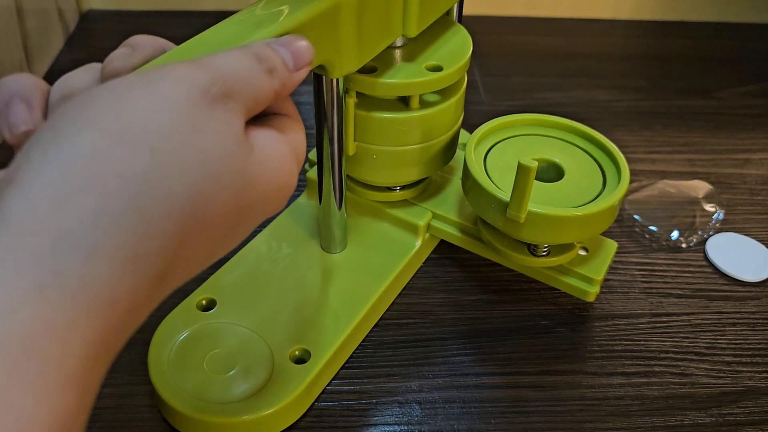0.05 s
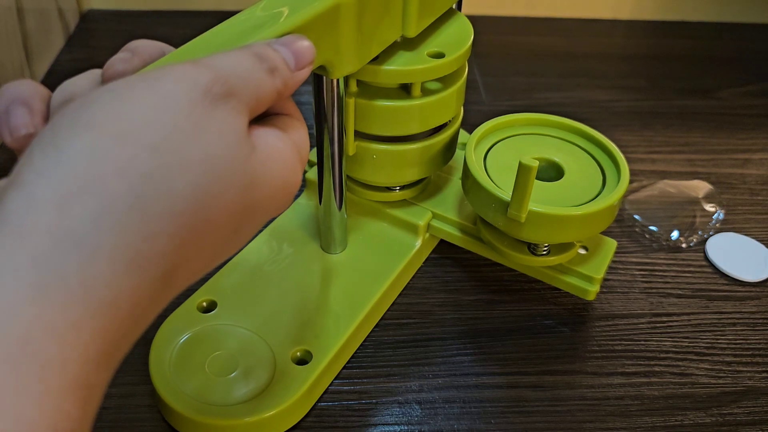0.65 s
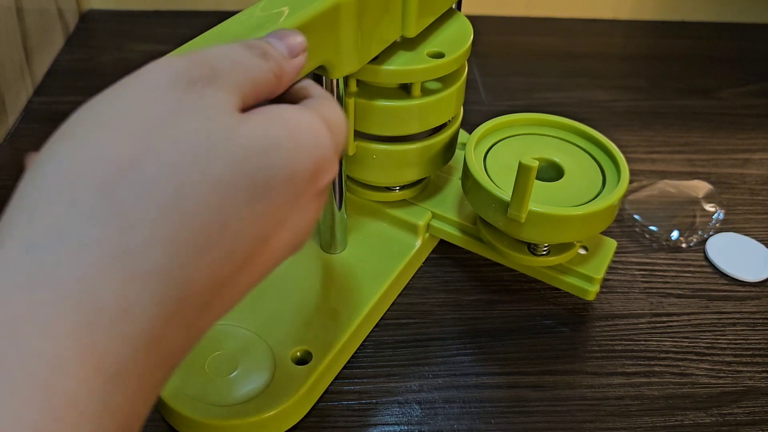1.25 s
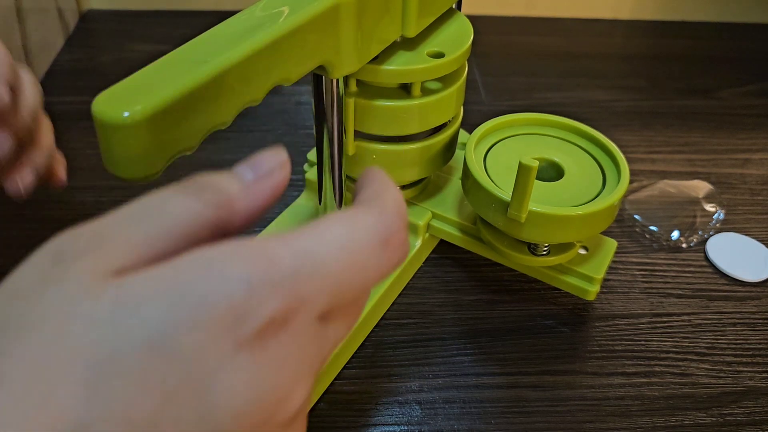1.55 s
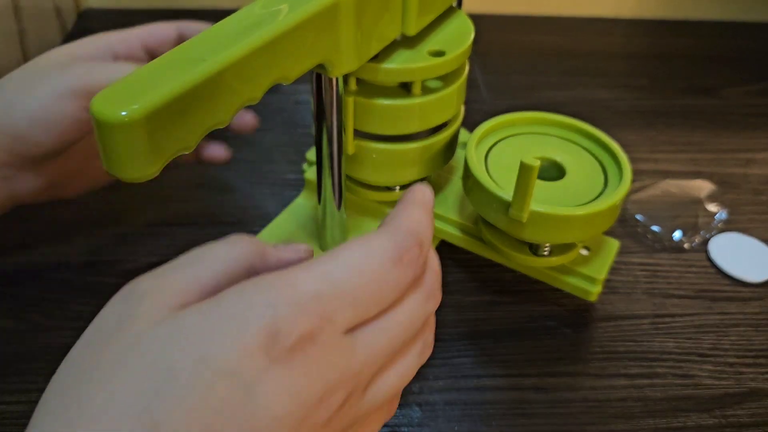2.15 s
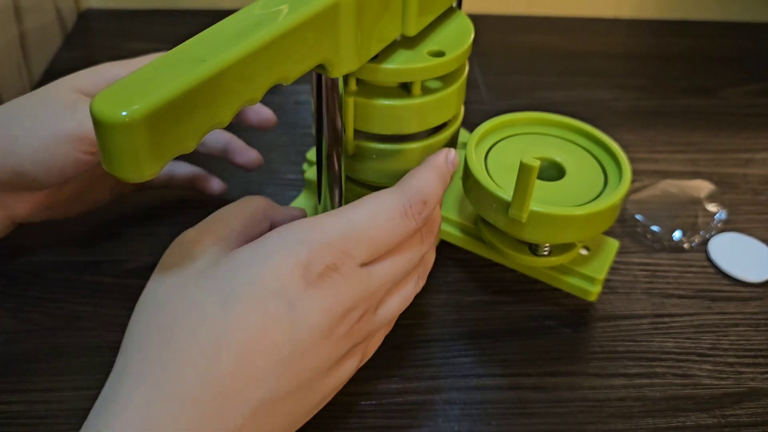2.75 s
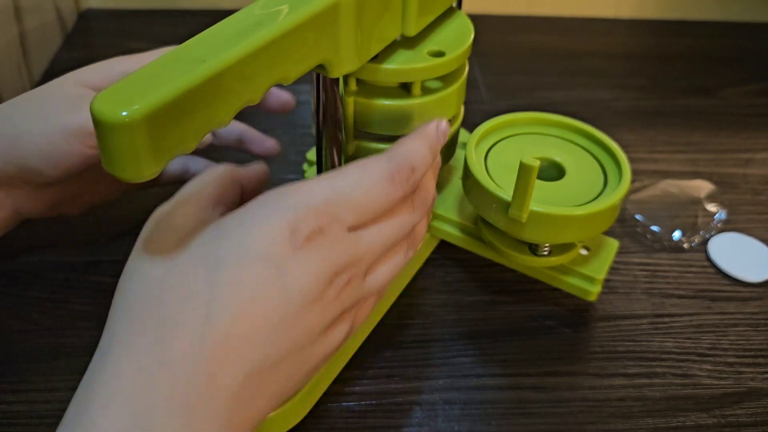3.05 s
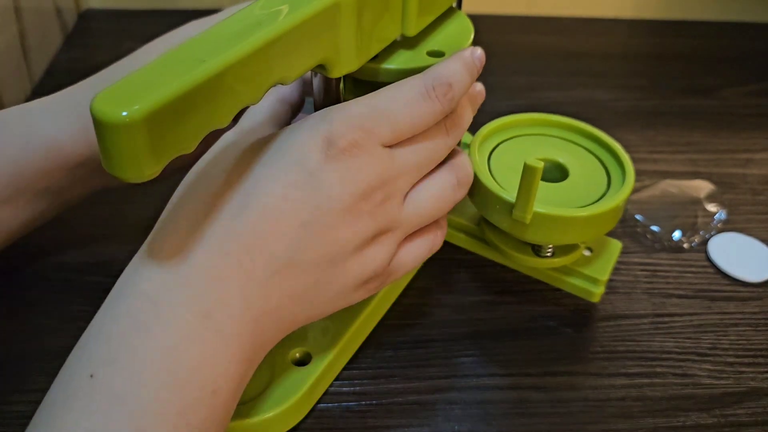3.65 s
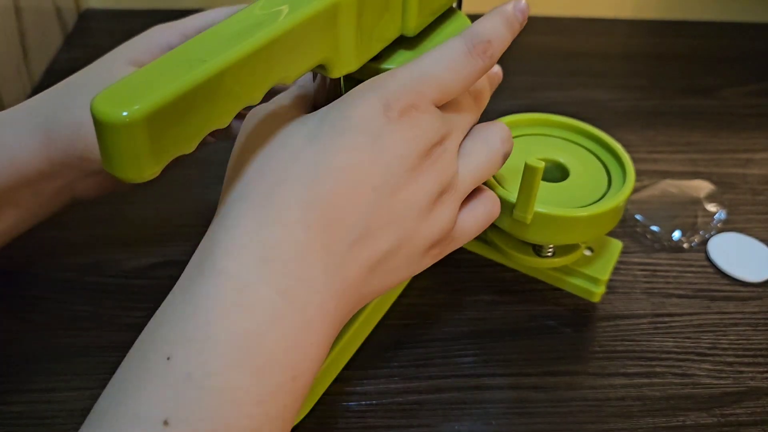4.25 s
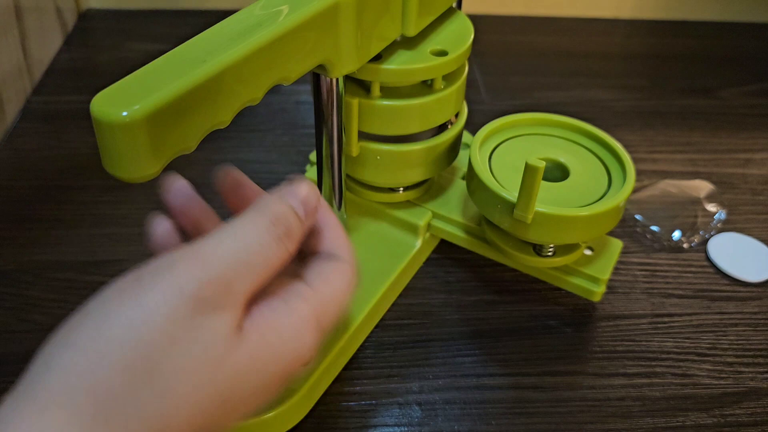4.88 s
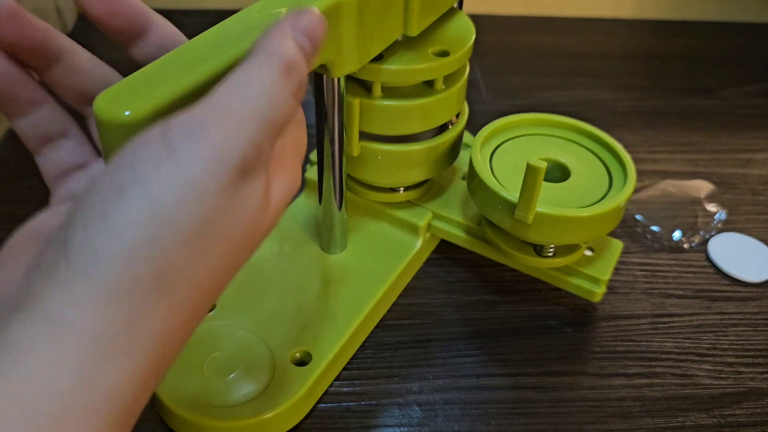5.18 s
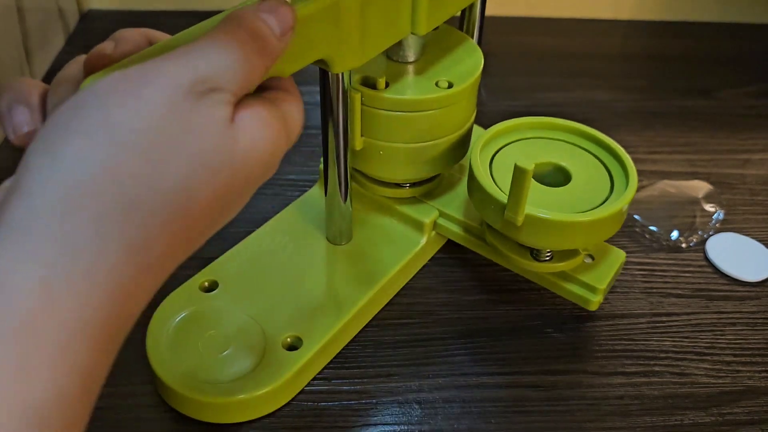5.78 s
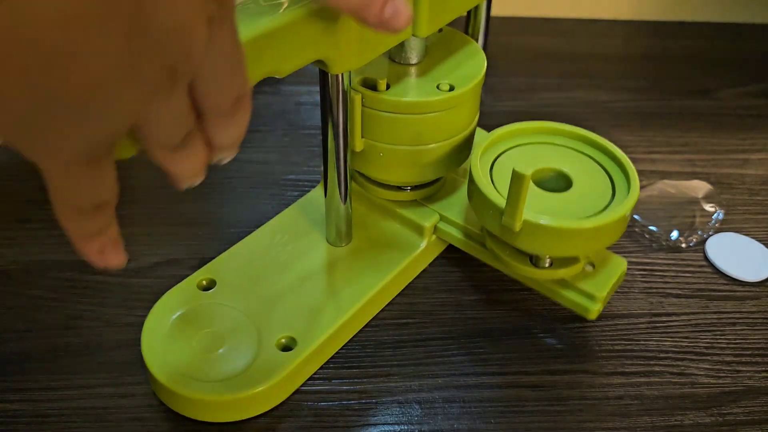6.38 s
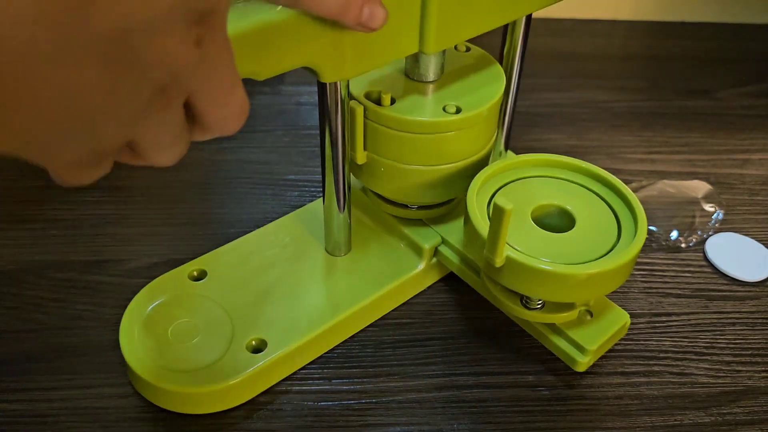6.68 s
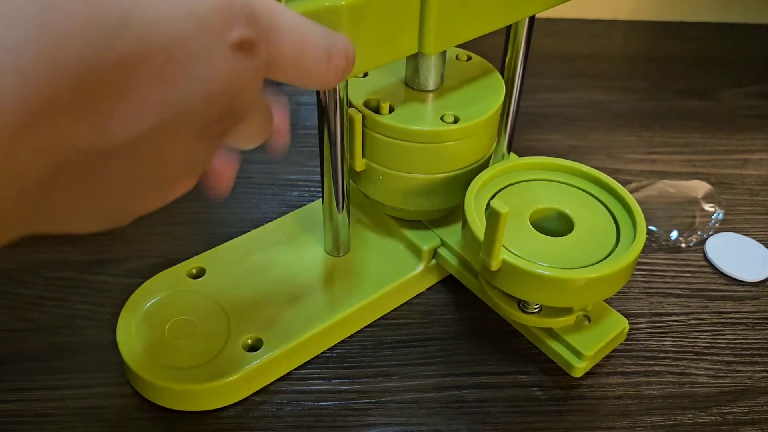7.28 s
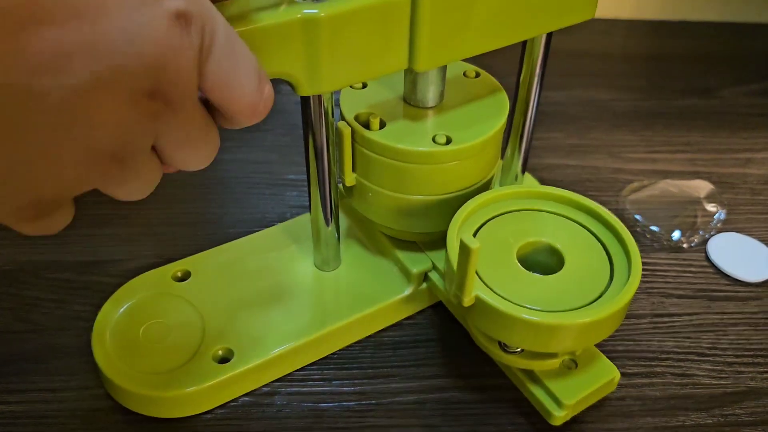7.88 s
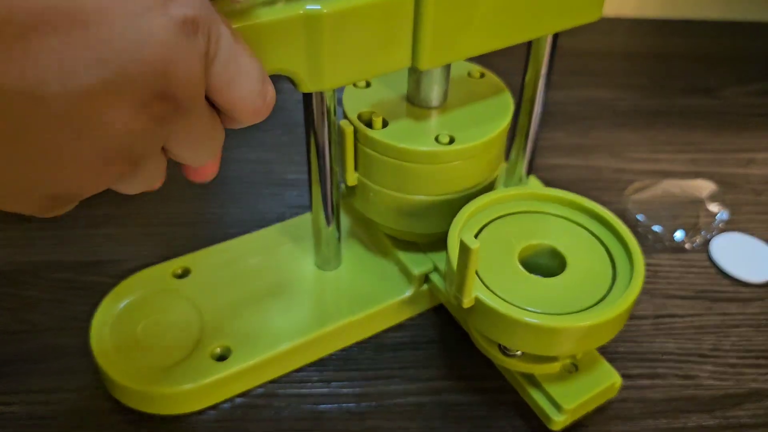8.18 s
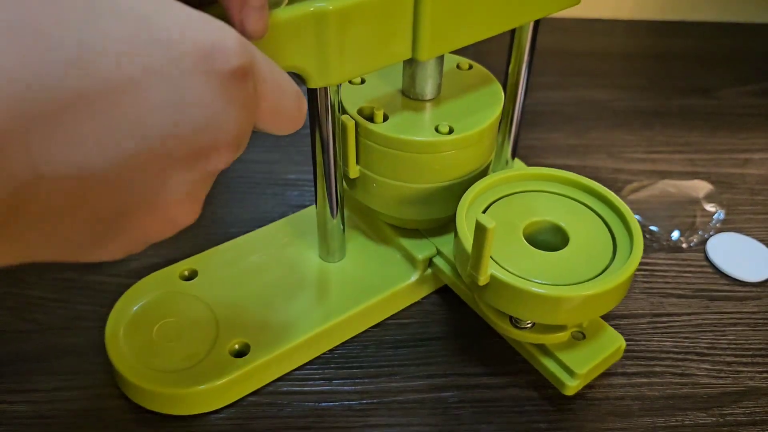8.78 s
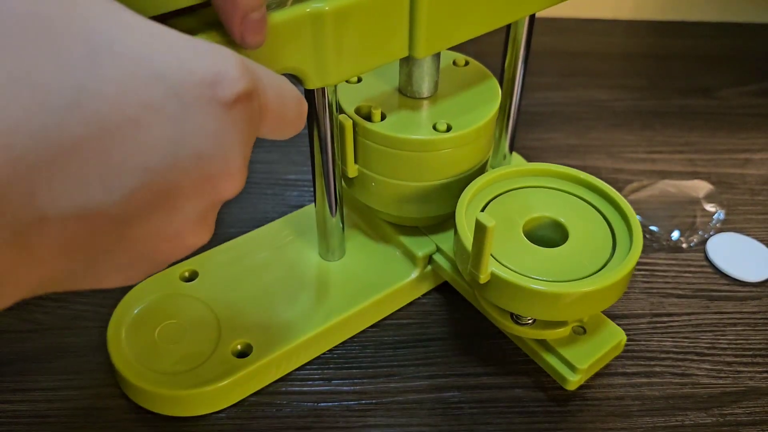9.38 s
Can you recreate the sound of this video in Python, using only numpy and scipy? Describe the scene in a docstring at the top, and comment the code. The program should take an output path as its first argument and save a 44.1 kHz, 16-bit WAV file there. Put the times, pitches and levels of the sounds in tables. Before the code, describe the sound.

Irregular plastic clacks and dull knocks from a lever-operated button maker in a small room, its held handle creaking softly later on.

```python
"""A hand-press button maker

A plastic press is worked on a wooden desk in a small room. The lever is let up, the die tray is
swivelled and the lever is pulled down until the dies clack together. Each contact chatters briefly,
rings the housing and the steel parts and thumps the desk. In between, hands slide and rumble.
Near the end the held lever creaks and squeaks faintly. Distant traffic swells and fades outside."""
import sys
import numpy as np
from scipy import signal
from scipy.io import wavfile

SR = 44100
rng = np.random.default_rng(int(sys.argv[2]) if len(sys.argv) > 2 else 0)


def int16_out(signal):
    """Quantize to a 16-bit WAV file."""
    q = np.round(np.clip(np.atleast_2d(signal).T, -1, 1) * 32767)
    wavfile.write(sys.argv[1], SR, q.astype(np.int16))


N = 420273
TIME = np.arange(N) / SR

# The tone of three noises: the quiet room, distant traffic and gripping hands.
# Each row: frequency in Hz, relative level in dB.
ROOM_TONE = [(25, -2.5), (55, 6), (85, -19), (135, -9), (250, -5.5), (400, -26.5), (1200, -28.5),
             (4000, -42), (9000, -76), (16000, -56.5)]
TRAFFIC_TONE = [(150, -17), (350, 6), (600, 4.5), (900, -9), (1500, -17.5), (3000, -25), (6000, -47.5)]
GRIP_TONE = [(60, -9), (95, 0.5), (120, 4.5), (170, 1), (260, -3), (400, -15), (800, -26.5), (2000, -43.5),
             (5000, -53.5)]
# Hiss of sliding skin. # Each row: frequency in Hz, relative level in dB.
SLIDE_HISS = [(300, -21.5), (1500, 4), (4000, 0), (7000, -6), (10000, -12.5), (12000, 7), (16000, -7)]
# The room's echo. Each row: frequency in Hz, seconds to fade by 60 dB.
ECHO_FADE = [(120, 0.45), (500, 0.36), (2000, 0.47), (7000, 0.35), (14000, 0.38)]
# How alike left and right are. Each row: frequency in Hz, likeness (1 means the same).
STEREO_LIKENESS = [(100, 0.98), (250, 0.88), (600, 0.77), (1200, 0.16), (2500, 0.11), (12000, 0.072)]
# Distant traffic outside swells and fades. Each row: loudest moment in seconds, level in dB.
TRAFFIC_SWELLS = [(2.0, -57.5), (9.1, -54)]
# Hands bear on the press. Each row: start and end in seconds, rumble in dB, desk ring in dB.
HAND_GRIPS = [(0, 2.4, -63, -88.5), (3.6, 3.64, -51, -68), (5.3, 5.696, -38.5, -68), (6.1, 6.235, -58, -72),
              (6.75, 8.7, -55.5, -72.5), (8.8, 9.9, -52.5, -74)]
# Skin slides over plastic. Each row: start and end in seconds, hiss in dB.
SKIN_SLIDES = [(1.1, 1.6, -76.5), (1.95, 2.03, -74.5), (2.24, 2.29, -71), (4.84, 5.06, -67.5),
               (5.95, 6.58, -72), (7.5, 7.58, -71), (7.7, 9.3, -79), (8.035, 8.04, -81)]
# The held lever's squeak. Each row: time in seconds, pitch in Hz, level in dB.
SQUEAK_PATH = [(8.82, 10300, -100), (8.881, 11950, -67.5), (8.941, 12860, -82), (9.0, 11900, -75),
               (9.059, 11400, -84), (9.12, 10830, -99)]

# The notes that ring in the desk, the base plate and the press (frame and housing, then steel).
# Each row: pitch in Hz, relative level in dB, seconds to fade by 60 dB.
DESK_NOTES = [(72, -10, .3), (99, -12, .15), (119, 0, .46), (184, -6, .25)]
BASE_NOTES = [(149.6, -1, .12), (181, -1, .15), (237.2, 6, 0.11), (301, -5, 0.52), (342.5, 1, 0.14)]
PRESS_NOTES = [(341.2, -4.5, 0.067), (593, -2, 0.06), (794, -8, 0.15), (916, -12, 0.045),
               (1256, -9.5, 0.096), (1410, -0.5, 0.03), (1671, -9.5, 0.043), (1825, -7, 0.17),
               (2023, -3, 0.07), (4620, -11, 0.24), (7250, -2.5, 0.12), (11880, -13.5, 0.13)]
# The tone given to the struck plastic. Each row: frequency in Hz, relative level in dB.
PLASTIC_TONE = [(150, -6), (450, 2), (750, 1), (1100, -1), (1700, 6), (2800, 5), (4500, -1), (7300, -3.5),
                (9800, -13.5), (12000, 0.5), (16000, -15)]
# The borders in Hz of four ranges, from low to high: desk, frame, housing, steel.
PART_BORDERS = [70, 320, 1200, 5000, 16500]
# Heavy blows lose their top treble. Each row: housing level in dB, treble limit in Hz.
TREBLE_LIMITS = [(-32.5, 22000), (-26, 10500), (-15, 11500)]

# Light ticks of the steel rods and spring. Each row: start in seconds, strength in dB, pitch in Hz.
STEEL_TICKS = [(0.3141, -50, 3900), (0.486, -60.5, 7300), (0.6679, -39, 4250), (1.76, -57.5, 11300),
               (2.2737, -54.5, 12100), (3.2185, -51, 4540), (4.0278, -52.5, 4440), (6.325, -50, 4240),
               (7.0998, -55, 5340), (7.1477, -54.5, 4450), (8.0334, -53.5, 11560), (8.2783, -57.5, 11200),
               (8.311, -56, 3750), (9.1336, -40, 3400)]
# Dull knocks of hand and lever on the frame.
# Each row: start in seconds, strength in dB, desk thump in dB, pitch in Hz.
FRAME_KNOCKS = [(0.076, -45.5, -34, 2070), (0.091, -37.5, -36, 880), (0.372, -47, -55, 980),
                (0.666, -32, -35, 495), (4.03, -39, -41.5, 844), (4.473, -38.5, -52, 560),
                (4.496, -37, -41.5, 1580), (5.181, -41.5, -36.5, 600), (5.277, -37.5, -45.5, 527),
                (5.353, -45, -22.5, 1533), (5.678, -29, -22, 687), (6.696, -48.5, -36, 670),
                (6.969, -46.5, -36.5, 570), (7.447, -48.5, -62, 623), (7.852, -38, -33, 634),
                (8.884, -48, -44.5, 696), (8.992, -48.5, -46, 654), (9.178, -45, -40.5, 560),
                (9.462, -48, -63.5, 693)]
# Loose plastic parts rattle. Each row: start in seconds, strength in dB,
# hardness (steel level minus housing level) in dB, chatter time in seconds, pitch in Hz.
LOOSE_RATTLES = [(0.057, -41, -34, 0.0042, 1990), (4.338, -37, -12.5, 0.0073, 2030),
                 (5.189, -46.5, -21.5, .022, 2593), (5.701, -29, -9.5, 0.014, 1564),
                 (6.378, -58.5, -26, 0.00095, 1310), (6.602, -55.5, -32.5, .005, 1440),
                 (6.842, -45, -15, 0.012, 2740), (7.802, -50, -30, 0.0086, 2580),
                 (8.476, -31, -28, 0.013, 2130), (8.509, -39, -18, 0.0072, 1810)]
# Lever, tray and dies hit their stops. Each row: start in seconds, strength in dB,
# desk thump in dB, hardness in dB, chatter time in seconds, pitch of the struck part in Hz.
STOP_CLACKS = [(0.637, -45, -34.5, -23, 0.0066, 1140), (0.654, -35, -22.5, -11.5, 0.0014, 4400),
               (3.334, -36, -30.5, -18, 0.005, 1960), (3.349, -31, -29.5, -11, 0.011, 1990),
               (3.377, -40.5, -37.5, -16, .004, 1960), (3.654, -49.5, -49, -15, 0.0035, 1400),
               (3.705, -48, -41, -15, 0.0064, 1510), (4.319, -43.5, -34, -20.5, 0.01, 518),
               (5.317, -27.5, -46.5, -14.5, .003, 1560), (5.38, -23, -24, -16.5, .007, 1820),
               (5.387, -14.5, -26.5, -3.5, 0.0083, 1800), (5.402, -13.5, -20, -11, .003, 931),
               (5.561, -21.5, -22.5, -5.5, 0.0099, 1040), (7.485, -41.5, -38.5, -20.5, 0.0031, 2050),
               (7.837, -49.5, -54, -18, 0.0024, 2890), (8.421, -30, -35, -3.5, 0.00068, 3140),
               (8.444, -35, -26.5, 3, 0.0016, 3400), (8.454, -42, -36, 9.5, 0.0044, 4500)]


def from_db(db):
    """Turn decibels into a number to multiply by."""
    return 10 ** (np.asarray(db) / 20)


def unit_energy(x):
    """Scale a sound so that its energy, averaged over the channels, is 1."""
    return x / np.sqrt(np.mean(np.sum(x ** 2, axis=-1)) + 1e-20)


def at_hz(table, hz):
    """Read a value between the rows of a frequency table."""
    frequencies, values = np.transpose(table)
    return np.interp(np.log(hz), np.log(frequencies), values)


def band(x, low, high, order=2):
    """Keep the sound between two frequencies in Hz."""
    return signal.sosfilt(signal.butter(order, [low, high], "band", fs=SR, output="sos"), x + 1e-18)


def convolve(x, response):
    """Let every sample of x set off its own copy of the response."""
    return signal.fftconvolve(np.atleast_2d(x), np.atleast_2d(response), axes=-1)[:, :N]


def stereo_bands(size):
    """Give (Hz, noise) for each half octave; left and right are less alike in the treble."""
    edges = 22 * 2 ** np.arange(0, 9.6, .5)
    white = rng.standard_normal((2, 2, size + 4000))
    for k, (low, high) in enumerate(zip(edges, edges[1:])):
        mid, side = band(white[k % 2], low, high)[:, -size:]
        hz = np.sqrt(low * high)
        alike = np.clip(at_hz(STEREO_LIKENESS, hz), -.99, .99)
        yield hz, np.sqrt(1 + alike) * mid + np.sqrt(1 - alike) * side * [[1], [-1]]


def noise(tone):
    """Steady stereo noise with the given tone and an average power of 1."""
    return np.sqrt(N) * unit_energy(sum(from_db(at_hz(tone, hz)) * x for hz, x in stereo_bands(N)))


def ringing(notes, scatter_db=0, blur=0):
    """A struck object rings at its own notes; loose joints can blur their pitch."""
    t, out = TIME[:SR // 2], 0
    for k, (hz, db, fade_s) in enumerate(notes):
        steps = np.arange(0, .5, 4 / hz)
        wander = np.interp(t, steps, np.cumsum(rng.normal(0, blur, len(steps))))
        lag = rng.normal(0, 3e-5, (2, 1))   # high notes reach the two sides out of step
        wave = np.sin(2 * np.pi * hz * (t + lag) + wander - wander[0]) * from_db(-60 * t / fade_s)
        out = out + (-1) ** k * from_db(db + scatter_db * rng.normal()) * unit_energy(wave)
    return out


def rumble_and_traffic(rumble_db=-55, traffic_db=-67.5, swell_s=.12, lag_s=.0004):
    """The room rumbles low; distant traffic swells and fades, reaching the right side first."""
    traffic = noise(TRAFFIC_TONE)
    traffic[0] = np.interp(TIME - lag_s, TIME, traffic[0])
    swells = sum(from_db(db) / (1 + ((TIME - s) / swell_s) ** 2) for s, db in TRAFFIC_SWELLS)
    return from_db(rumble_db) * noise(ROOM_TONE) + (from_db(traffic_db) + swells) * traffic


def room(x, echo_db, build_s, treble_db):
    """Add wall echoes that build up quickly and fade, each frequency at its own speed."""
    t = TIME[:SR]
    tone = [(200, 0.0035), (2000, 0.0012), (14000, treble_db)]   # Hz, dB
    tail = sum(from_db(at_hz(tone, hz) - 60 * t / at_hz(ECHO_FADE, hz)) * hiss
               for hz, hiss in stereo_bands(SR))
    build_up = 1 - np.exp(-(t / build_s) ** 2)
    return x + from_db(echo_db) * convolve(x, unit_energy(tail * build_up))


def strokes(rows, rise_s, fall_s):
    """The loudness of hand movements: each sets in, holds and lets go."""
    return sum(from_db(db) * np.exp(np.minimum(TIME - start, 0) / rise_s
                                    - np.maximum(TIME - end, 0) / fall_s) for start, end, db in rows)


def gripping_hands(resting_db=-59.5, rise_s=.077, fall_s=.091):
    """The grip of the hands rumbles and makes the desk ring."""
    grips, tremor = np.array(HAND_GRIPS), noise(GRIP_TONE)
    rumble = (from_db(resting_db) + strokes(grips[:, :3], rise_s, fall_s)) * tremor
    push = strokes(grips[:, [0, 1, 3]], rise_s, fall_s) * tremor
    return rumble + convolve(push, unit_energy(ringing(DESK_NOTES)))


def sliding_skin(uneven_db=2.5):
    """Skin hisses unevenly as it slides over the plastic."""
    steps = np.arange(0, 10, .025)
    flicker_db = np.interp(TIME, steps, rng.normal(0, uneven_db, len(steps)))
    return strokes(SKIN_SLIDES, rise_s=.042, fall_s=.055) * from_db(flicker_db) * noise(SLIDE_HISS)


def squeak(jitter_hz=1007):
    """The held lever gives a thin, unsteady whistle that rises and falls."""
    s, hz, db = np.transpose(SQUEAK_PATH)
    pitch = np.interp(TIME, s, hz) + jitter_hz * rng.standard_normal(N)
    level = from_db(np.interp(TIME, s, db, left=-200, right=-200))
    return level * np.sin(2 * np.pi * np.cumsum(pitch) / SR)


def chatter(chatter_s, slips_per_s, slip_db):
    """The force of a contact: a first touch, then tiny slips that swell and die away."""
    age = TIME[:SR // 12] / chatter_s
    slips = rng.random(len(age)) < slips_per_s / SR
    force = slips * rng.normal(0, from_db(slip_db), len(age)) * 2 * np.sqrt(age) * np.exp(-age)
    force[0] = 1
    return force


def plastic(count, fade_s, slope):
    """Plastic rings briefly, differently at each of count spots; fade_s is the fade at 1000 Hz."""
    size, out = SR // 10, 0
    for hz, hiss in stereo_bands(count * size):
        band_fade_s = fade_s * (1000 / hz) ** slope
        level = from_db(at_hz(PLASTIC_TONE, hz) - 60 * TIME[:size] / band_fade_s)
        out = out + level * hiss.reshape(2, count, size)
    return np.pad(out.swapaxes(0, 1), [(0, 0), (0, 0), (0, SR // 2 - size)])


def creaks(from_s, per_s, level_db, spread_db):
    """The held lever's joints slip in tiny creaks that ring the housing, some duller than others."""
    out = 0
    for body, top_hz in zip(plastic(count=4, fade_s=.06, slope=.5), np.geomspace(700, 5000, 4)):
        starts = (rng.random(N) < per_s / 4 / SR) & (TIME > from_s)
        sizes = from_db(level_db + spread_db * rng.uniform(-1, 1, N))
        response = unit_energy(body) + ringing(PRESS_NOTES, scatter_db=2, blur=.5) / 2
        creak = convolve(chatter(.004, slips_per_s=1500, slip_db=0), response)
        out = out + convolve(starts * sizes, unit_energy(band(creak, 350, top_hz)))
    return out


def rattle(s, db, hardness_db, chatter_s, hz):
    """One contact of a loose part: it shakes mainly the housing, and less the desk and frame."""
    return s, db - 4, db - 9.5, db, db + hardness_db, chatter_s, hz


def contacts(bounce_s=.03, bounce_loss_db=13, bounce_chatter_s=.014):
    """Each row: start in seconds, desk, frame, housing and steel in dB, chatter seconds, pitch in Hz."""
    rows = [rattle(*row) for row in LOOSE_RATTLES]
    for s, db, desk_db, hardness_db, chatter_s, hz in STOP_CLACKS:
        frame_db = db - 3 - .33 * hardness_db   # the harder the clack, the less the frame takes
        rows.append((s, desk_db, frame_db, db, db + hardness_db, chatter_s, hz))
        # each clack throws the loose parts up, and they land a moment later
        rows.append(rattle(s + bounce_s, db - bounce_loss_db, hardness_db, bounce_chatter_s, hz))
    # soft knocks hardly reach the treble
    rows += [(s, desk_db, db, db - 16, db - 38, .0028, hz) for s, db, desk_db, hz in FRAME_KNOCKS]
    return rows + [(s, db - 6, db - 20, db - 10, db - 9, .0017, hz) for s, db, hz in STEEL_TICKS]


def struck_part(x, hz, boost_db=10, sharpness=8.3):
    """The part that is hit boosts the sound around its own pitch."""
    b, a = signal.iirpeak(hz, sharpness, fs=SR)
    return x + from_db(boost_db) * signal.lfilter(b, a, x + 1e-18)


def cushioned(x, housing_db):
    """A heavy blow stays in contact longer and loses its top treble."""
    limit_hz = min(np.interp(housing_db, *np.transpose(TREBLE_LIMITS)), .45 * SR)
    return signal.sosfilt(signal.butter(4, limit_hz, fs=SR, output="sos"), x)


def press(rows, ring_db, desk_ring_db, base_ring_db, base_share_db, level_span_s):
    """Every contact shakes the desk, the frame, the housing and the steel, each at its own level."""
    out, size = np.zeros((2, N + SR)), SR // 2
    bodies = plastic(count=len(rows), fade_s=.048, slope=.16)
    desk = from_db(desk_ring_db) * unit_energy(ringing(DESK_NOTES))
    for (s, *levels, chatter_s, hz), body in zip(rows, bodies):
        desk_db, frame_db, housing_db, _ = levels
        notes = from_db(ring_db) * ringing(PRESS_NOTES, scatter_db=1.5, blur=.45)
        response = struck_part(unit_energy(body) + notes, hz)
        shaken = convolve(chatter(chatter_s, slips_per_s=1300, slip_db=-2.5), response)[:, :size]
        bass, frame, housing, steel = (band(shaken, low, high, order=3)
                                       for low, high in zip(PART_BORDERS, PART_BORDERS[1:]))
        # a hard knock rings the base plate, a soft push mostly the desk; both build up gradually
        base_ring = from_db(base_ring_db) * unit_energy(ringing(BASE_NOTES, scatter_db=2, blur=1))
        base_share = from_db(base_share_db + .94 * (frame_db - desk_db))
        build_up = 1 - np.exp(-2 * TIME[:size] / chatter_s)
        thump = (desk + base_share * (unit_energy(bass) + base_ring)) * build_up
        # the first moments of each part set how loud it is
        start, onset = round(s * SR), round(max(.014, 2 * chatter_s) * SR)
        for db, part in zip(levels, (thump, frame, housing, cushioned(steel, housing_db))):
            early = np.sqrt(np.sum(part[:, :onset] ** 2, axis=1, keepdims=True) / (level_span_s * SR))
            out[:, start:start + size] += from_db(db) * part / early
    return out[:, :N]


def scene():
    """The press sounds in its room, over the hands that work it and the quiet background."""
    blows = press(contacts(), ring_db=-11.5, desk_ring_db=3, base_ring_db=9.5,
                  base_share_db=-5, level_span_s=.0054)
    creaking = creaks(from_s=6.6, per_s=10, level_db=-36.5, spread_db=2)
    machine = room(blows + creaking, echo_db=-9, build_s=.0037, treble_db=-2)
    return machine + gripping_hands() + sliding_skin() + squeak() + rumble_and_traffic()


def record(dry, tilt_db=.43, treble_tilt_db=-6, ceiling=.9, cutoff_hz=15750):
    """The left microphone is a little louder and brighter; peaks are rounded and the top is cut."""
    treble = signal.sosfiltfilt(signal.butter(2, 11000, "high", fs=SR, output="sos"), dry)
    heard = (dry + from_db(treble_tilt_db) * treble * [[1], [-1]]) * from_db([[tilt_db], [-tilt_db]])
    rounded = ceiling * np.tanh(heard / ceiling)
    return signal.sosfilt(signal.ellip(10, .3, 70, cutoff_hz, fs=SR, output="sos"), rounded)


dry = scene()
out = record(dry)
int16_out(out)
```